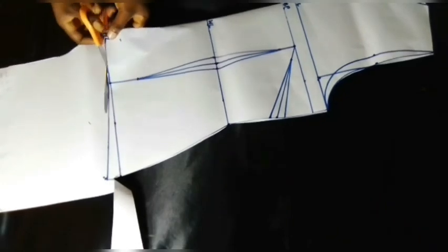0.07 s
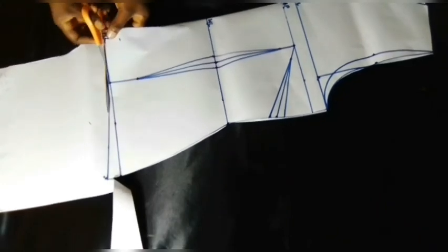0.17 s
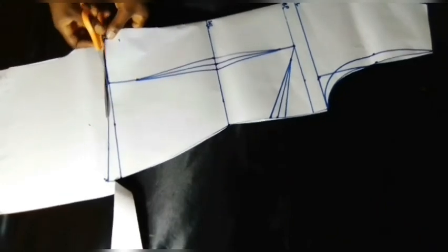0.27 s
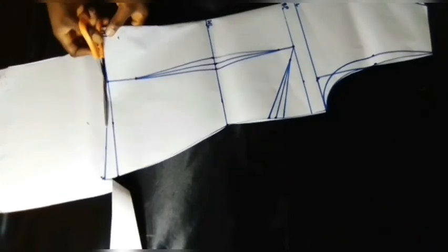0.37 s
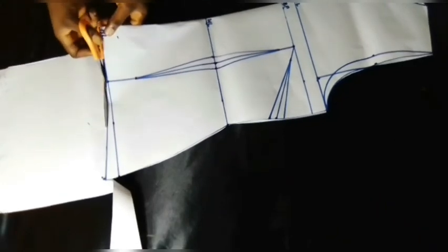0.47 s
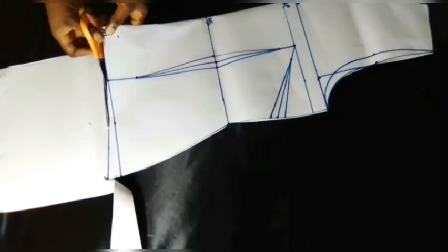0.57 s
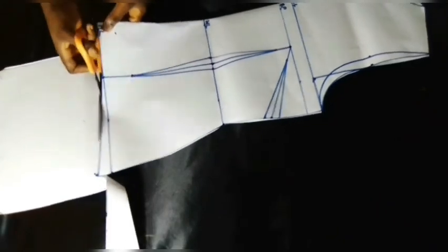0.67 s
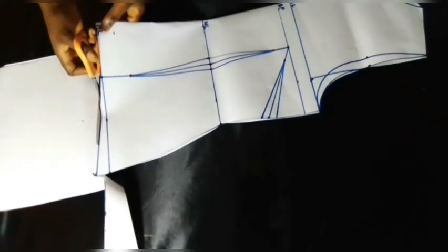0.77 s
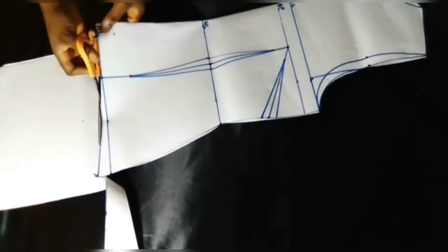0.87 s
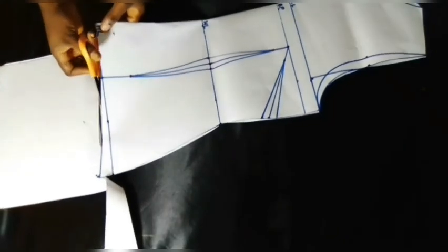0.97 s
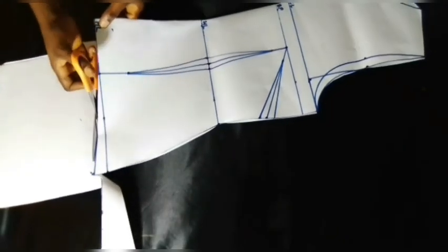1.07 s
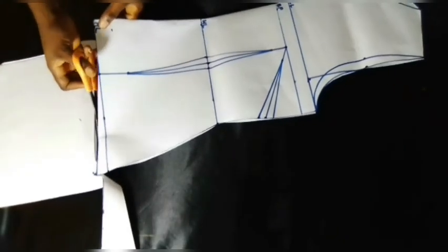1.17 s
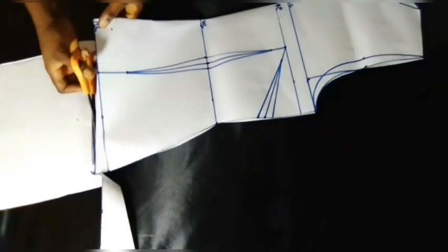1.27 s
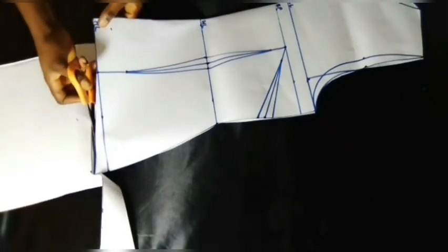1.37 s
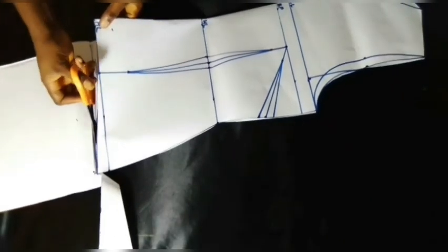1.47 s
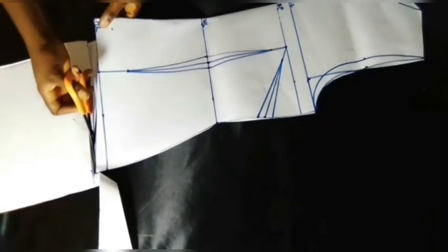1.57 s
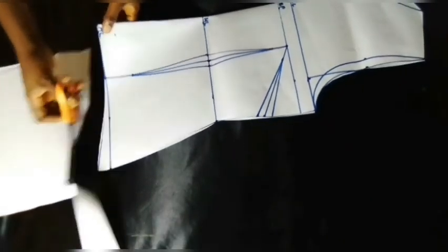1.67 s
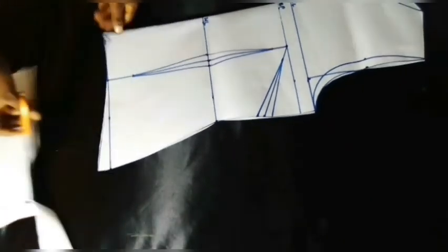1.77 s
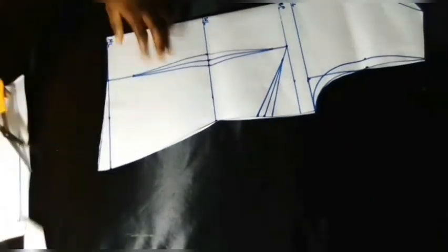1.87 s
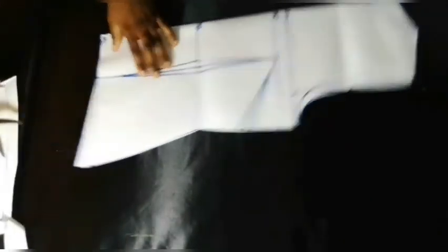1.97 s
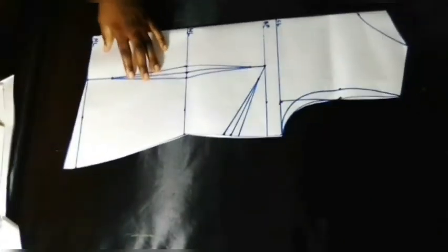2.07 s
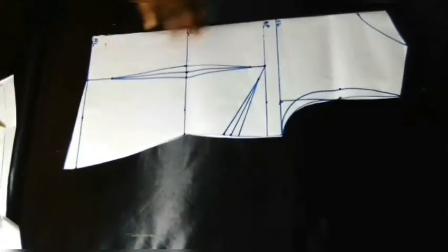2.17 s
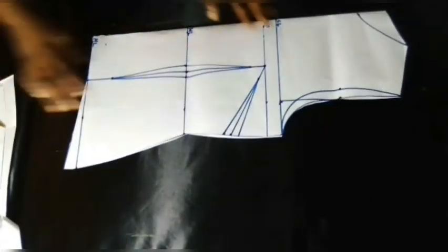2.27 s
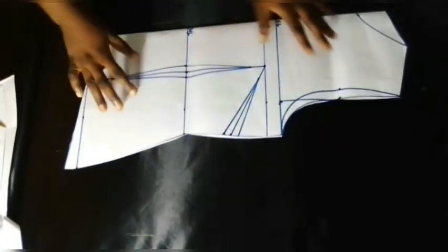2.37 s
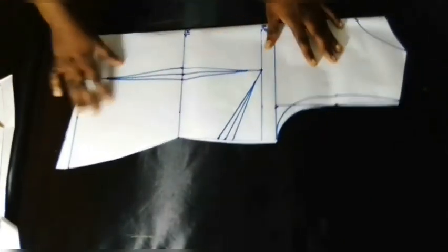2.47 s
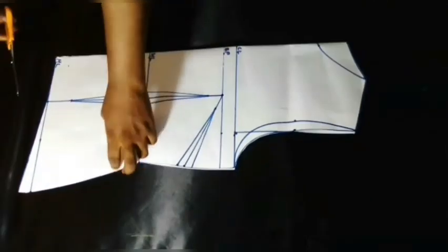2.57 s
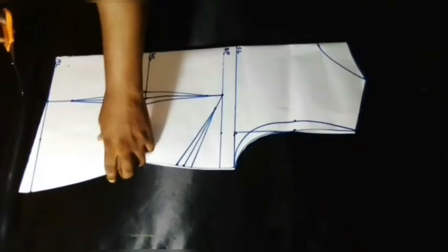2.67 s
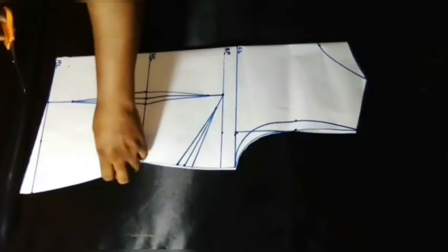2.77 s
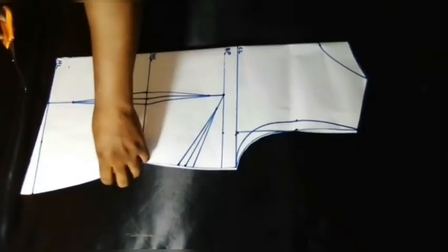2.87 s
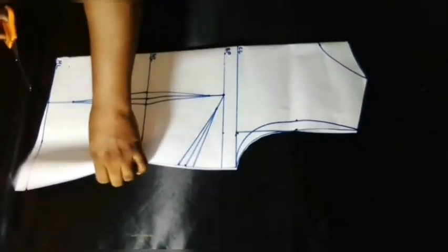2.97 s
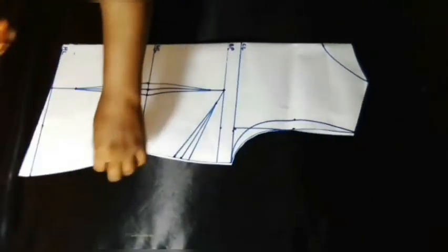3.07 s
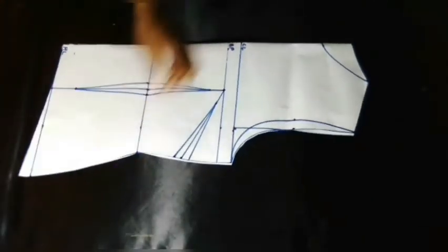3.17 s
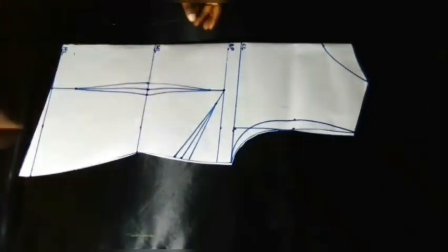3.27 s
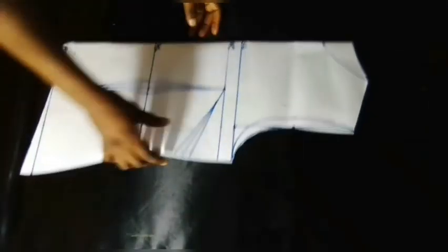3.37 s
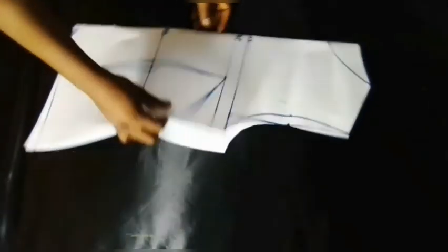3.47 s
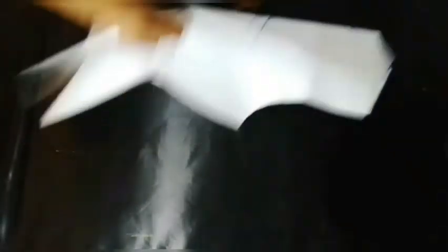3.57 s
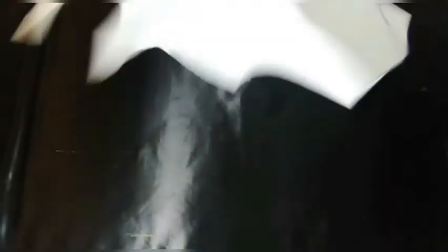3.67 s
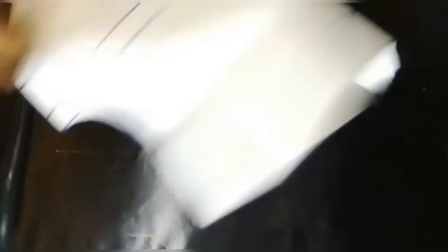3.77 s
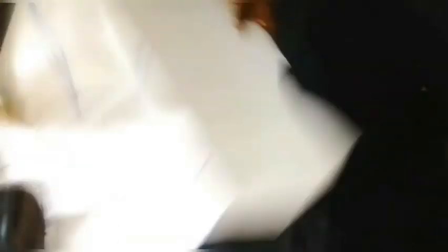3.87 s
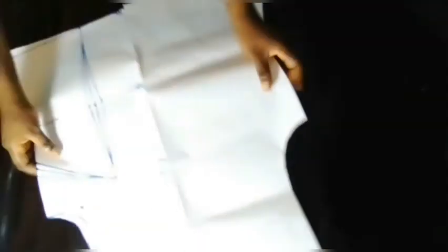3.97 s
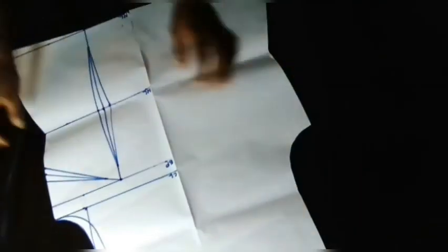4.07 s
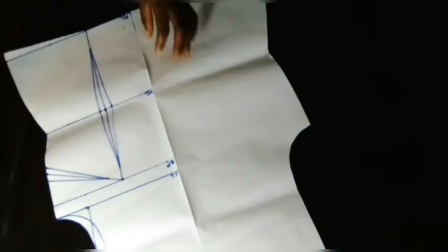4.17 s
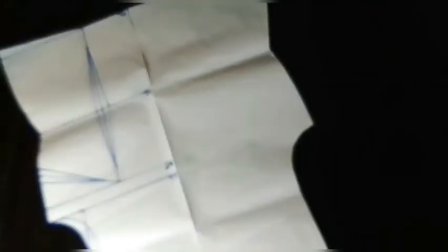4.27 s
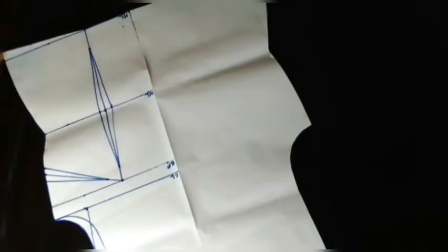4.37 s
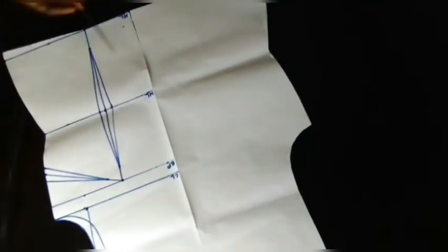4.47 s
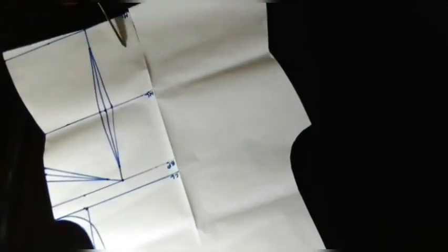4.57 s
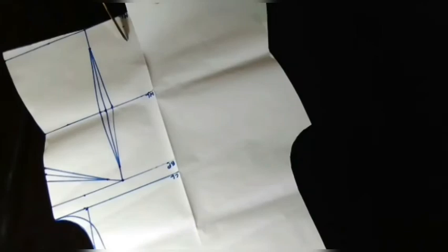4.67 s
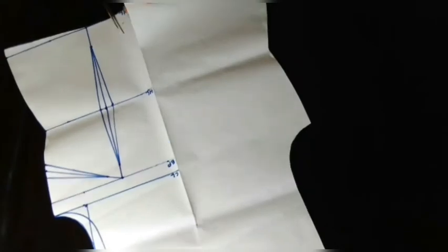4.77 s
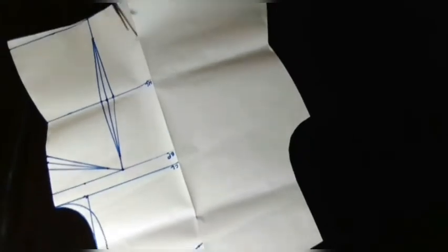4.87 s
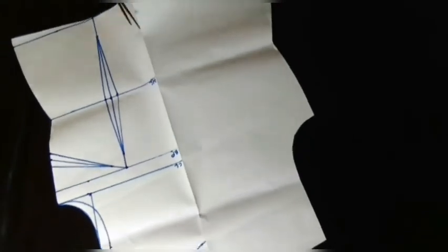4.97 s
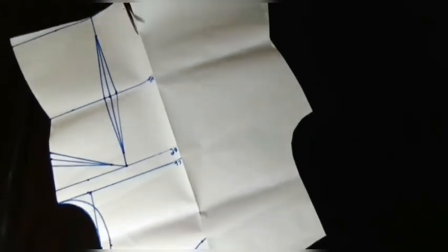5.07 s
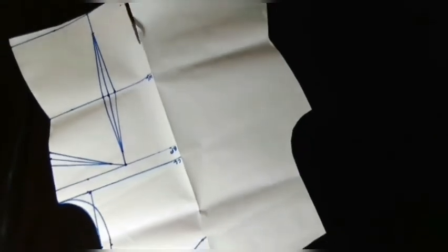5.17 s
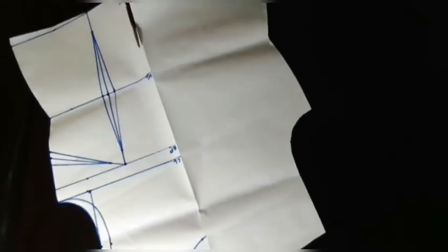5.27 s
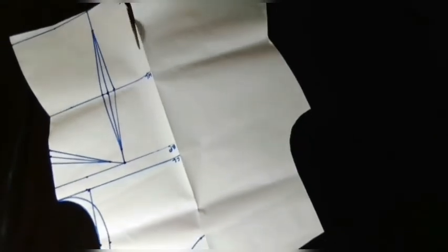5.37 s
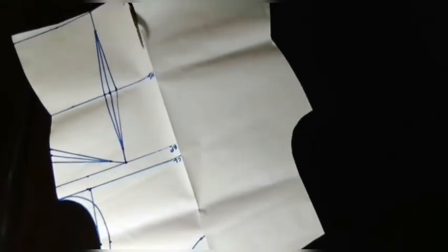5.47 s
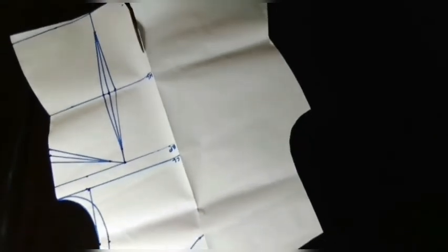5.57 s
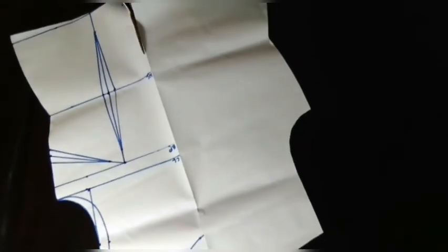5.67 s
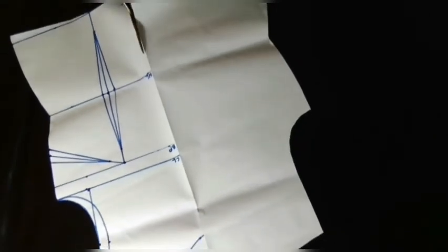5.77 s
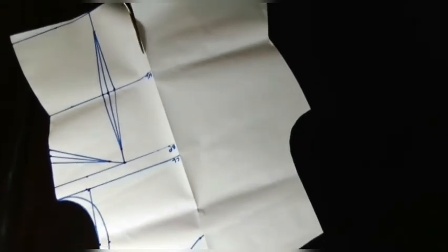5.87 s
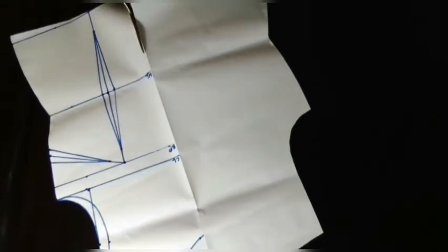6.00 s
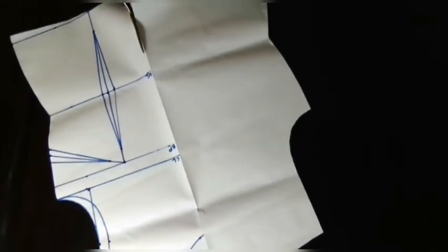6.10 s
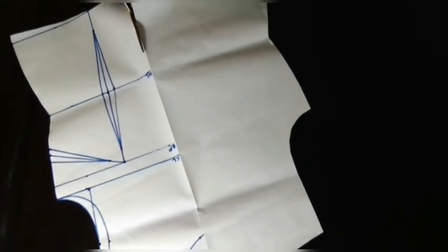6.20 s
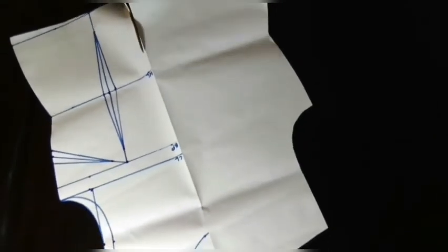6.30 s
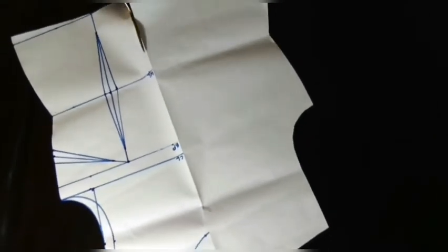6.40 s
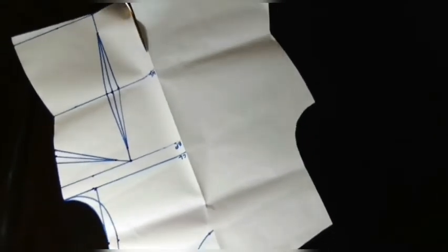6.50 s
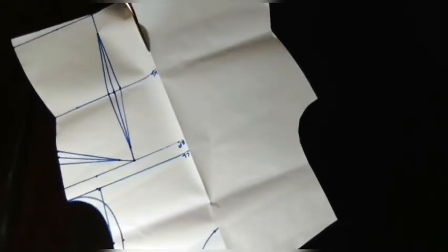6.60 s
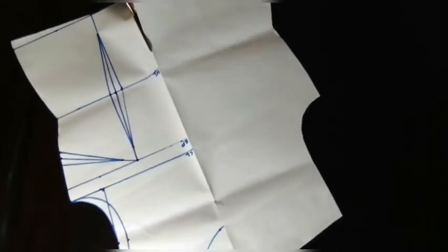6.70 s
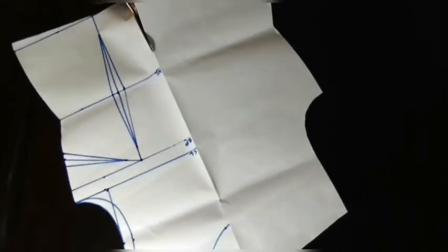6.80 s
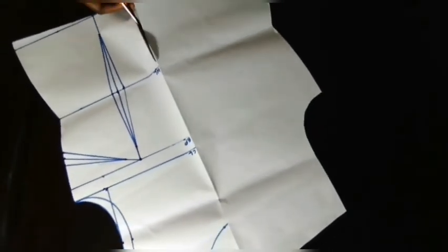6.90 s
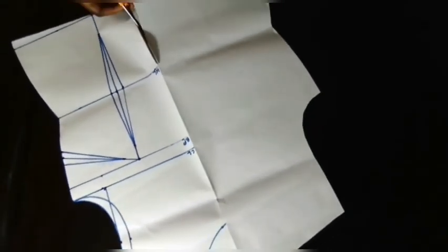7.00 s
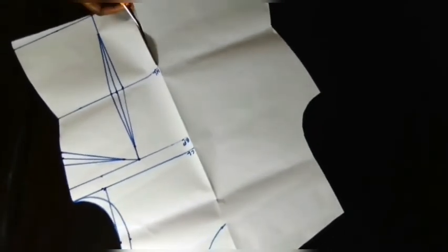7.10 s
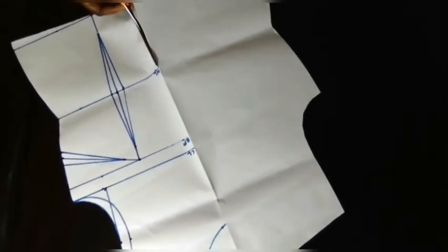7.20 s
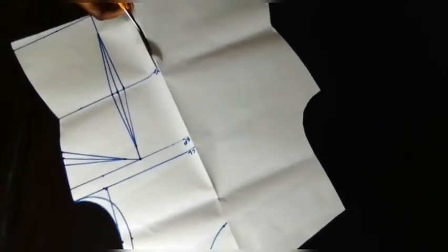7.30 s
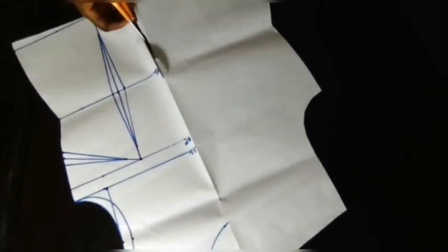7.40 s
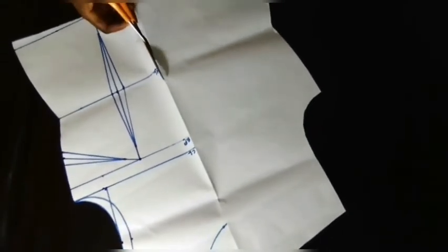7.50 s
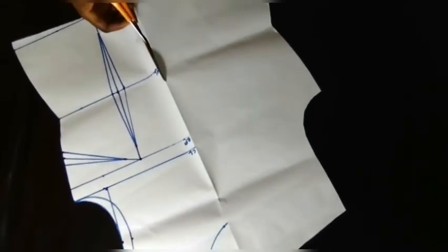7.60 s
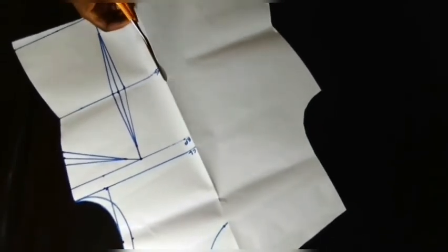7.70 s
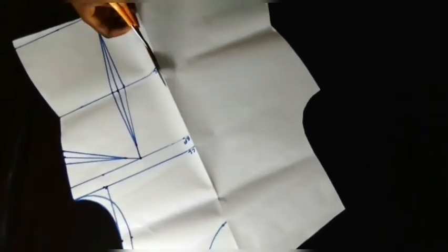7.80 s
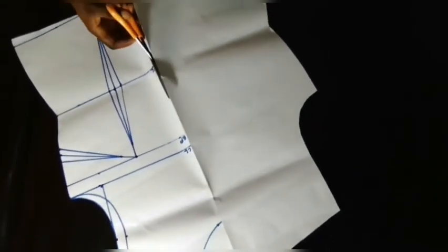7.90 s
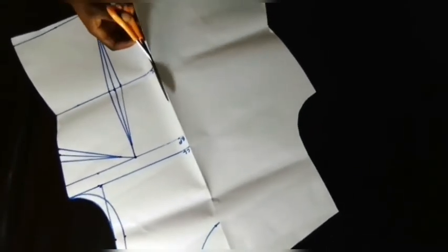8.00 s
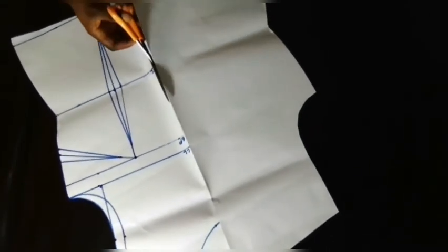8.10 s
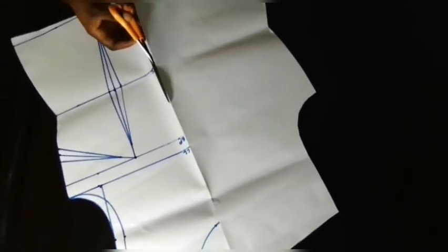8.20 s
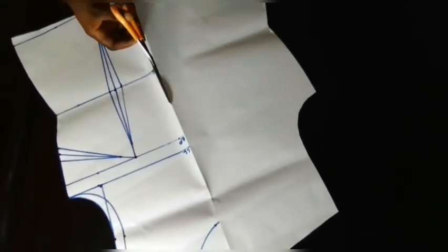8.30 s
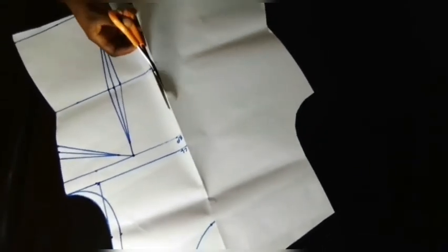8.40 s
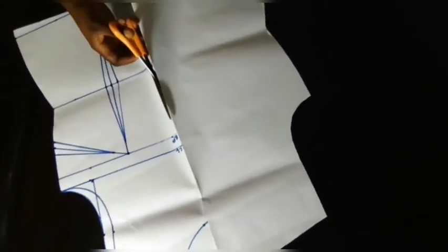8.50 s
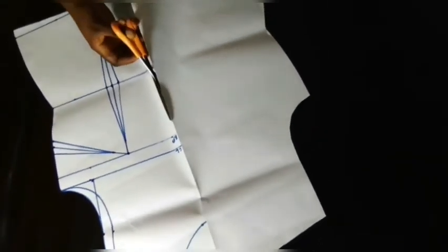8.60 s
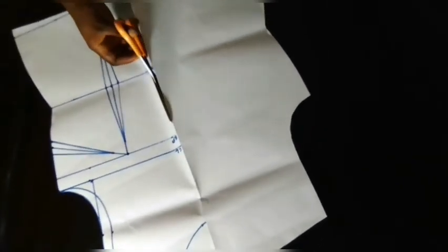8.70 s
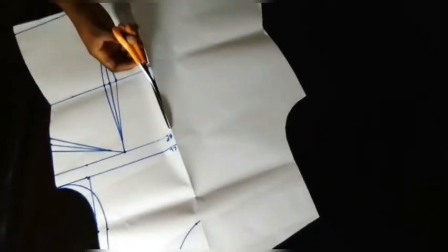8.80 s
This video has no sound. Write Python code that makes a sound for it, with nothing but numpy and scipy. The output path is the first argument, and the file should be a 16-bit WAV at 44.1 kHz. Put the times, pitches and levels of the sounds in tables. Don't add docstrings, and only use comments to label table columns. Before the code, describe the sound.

In a quiet, rather dry room, blades bite through paper with dense fibrous crunches and clicks. Then softer sliding and small table bumps, a brief gap in the sound, one strong low hand thud, and a burst of lively paper rattling. After sparse rustles and wooden taps, a second run of cutting begins with a bright snap and continues to the end. Thin hiss and far fan hum remain beneath.

```python
import sys
import numpy as np
from scipy import signal
from scipy.fft import rfft, irfft
from scipy.io import wavfile

SR = 44100
rng = np.random.default_rng(int(sys.argv[2]) if len(sys.argv) > 2 else 0)


def convert_level_to_amplitude(level_db):
    exponent = np.asarray(level_db, float) / 20
    return 10 ** exponent


def inscribe(sig):
    pcm = np.round(np.clip(np.atleast_2d(sig).T, -1, 1) * 32767)
    wavfile.write(sys.argv[1], SR, pcm.astype(np.int16))


N = 390285


def rms_one(x):
    return x / np.sqrt(np.mean(x ** 2) + 1e-20)


def low_pass(x, hz):
    return signal.sosfilt(signal.butter(4, hz, fs=SR, output="sos"), x)


def drift(rate):
    r = np.exp(-2 * np.pi * rate / SR)
    return rms_one(signal.lfilter([1], [1, -2 * r, r * r], rng.standard_normal(N + SR))[SR:])


def resonate(x, peaks):
    out = 0
    for k, (hz, width, db) in enumerate(peaks):
        r = np.exp(-np.pi * width / SR)
        b = (1 - r * r) / 2 * np.array([1, 0, -1])
        a = [1, -2 * r * np.cos(2 * np.pi * hz / SR), r * r]
        out = out + (-1) ** k * convert_level_to_amplitude(db) * signal.lfilter(b, a, x)
    return out


def ring(x, modes):
    out = 0
    for hz, db, t60 in modes:
        r = convert_level_to_amplitude(-60 / (t60 * SR))
        w = 2 * np.pi * hz / SR
        out = out + convert_level_to_amplitude(db) * signal.lfilter([0, np.sin(w)], [1, -2 * r * np.cos(w), r * r], x + 1e-18)
    return out


def held(s, hold, swell_db, rise, fall):
    start = max(round(s * SR) - SR // 10, 0)
    stop = min(round((s + hold) * SR) + SR // 5, N)
    age = np.arange(start, stop) / SR - s
    climb_db = rise * np.minimum(age, 0)
    hold_db = swell_db * np.clip(age / hold, 0, 1)
    fall_db = fall * np.maximum(age - hold, 0)
    return slice(start, stop), convert_level_to_amplitude(climb_db + hold_db - fall_db)


def clicks(events):
    out = np.zeros(N)
    out[[round(s * SR) for s, db in events]] = convert_level_to_amplitude([db for s, db in events])
    return out


def grains(per_s, spread_db):
    sizes = convert_level_to_amplitude(spread_db * np.minimum(rng.exponential(1, N), 5)) * rng.choice([-1, 1], N)
    return rms_one(sizes * (rng.random(N) < per_s / SR))


# (frequency [Hz], width
# [Hz], level [dB])
PRESENCE_PEAKS = [(3035, 340, -7), (3500, 420, 5.5), (3610, 340, -11.5)]
# (frequency [Hz], width [Hz], level [dB])
FLUTTER_PEAKS = [(1650, 130, 1.5), (2067, 470, 5), (2690, 980, 7)]
# (frequency [Hz], width [Hz], level [dB])
SHEET_PEAKS = [(715, 420, 0), (906, 250, -4), (1295, 510, 3.5)]
# (frequency [Hz], width [Hz], level [dB])
FIZZ_PEAKS = [(5500, 2000, 13), (8200, 2100, -6.5)]


def paper_voice(fibres, grit, flutter, body, fizz):
    out = 0
    # strength, resonances, top cut Hz, share of the bending
    layers = ((grit, PRESENCE_PEAKS, 4030, 0), (flutter, FLUTTER_PEAKS, 3100, 1),
              (body, SHEET_PEAKS, 2500, 1), (fizz, FIZZ_PEAKS, 10000, 0.3))
    for strength, peaks, cut_hz, bends in layers:
        steady, rung = 0, 0
        for peak in peaks:
            push = fibres * rng.choice([-1, 1], N)
            bending = convert_level_to_amplitude(bends * 4 * drift(15.4))
            steady = steady + resonate(push, [peak])
            rung = rung + resonate(push * strength * bending, [peak])
        out = out + low_pass(rung, cut_hz) / np.std(low_pass(steady, cut_hz))
    return out


def colour(action, depth_db):
    flutter_db, body_db, fizz_db = action
    return convert_level_to_amplitude([[0], [flutter_db + 0.54 * depth_db], [body_db + 0.96 * depth_db],
                [fizz_db - 0.29 * depth_db]])


# (time [s], hold [s], grit [dB], swell over the hold [dB], depth, how far the sheet joins in [dB])
FIRST_STROKES = [(0.0, 0.025, -50, -9, 6), (.05, 0.047, -56.5, -5, 6), (.16, .11, -51.5, -4, 5),
                 (.29, 0.097, -52.5, 1, 8), (.43, 0.071, -54.5, 0.5, 0), (.5, 0.093, -56.5, -16, 16),
                 (.575, 0.097, -51, 7, 7), (.755, 0.078, -55.5, 0, -3), (.87, .17, -50.5, 0.5, 4),
                 (1.14, 0.06, -47.5, 0, 1), (1.25, 0.055, -40.5, -3, 1.5), (1.36, 0.033, -47, 6.5, -6),
                 (1.42, 0.094, -51.5, 3, -7), (1.55, 0.045, -45, -6, -5)]
# (time [s], peak [dB], rise [s], depth [dB])
FIRST_BITE_SWELLS = [(.1533, -34, 0.0068, 15), (0.1708, -22.5, 0.0065, 7.5), (0.2463, -24.5, 0.0099, -11),
                     (0.494, -34.5, 0.012, 7), (.6026, -36.5, 0.018, 1), (.643, -44, 0.0035, 15.5),
                     (.7572, -44, 0.0048, -11), (0.903, -32, 0.0094, -9), (0.979, -27, 0.009, -3),
                     (1.06, -55, 0.017, 18.5), (1.114, -32, 0.0036, -3), (1.1694, -34, 0.015, -2),
                     (1.1994, -38, 0.0033, 5), (1.287, -41, 0.0059, -3), (1.381, -22.5, 0.01, -9),
                     (1.5465, -29.5, 0.017, -4)]
# (time [s], hold [s], grit [dB], swell [dB], depth [dB])
SHEET_SLIDES = [(1.618, 0.14, -52, 7.5, -13), (1.775, 0.25, -55.5, 6, -11), (2.399, 0.062, -52.5, -5, -17),
                (2.55, 0.28, -72.5, 6, 4), (2.872, 0.068, -57, 5, -4), (2.99, 0.044, -55, 5, -11),
                (3.413, .18, -50, 2, -6), (3.626, 0.27, -41, -5.5, 11), (3.904, 0.15, -57.5, 2, 2.5),
                (4.403, 0.29, -77, 20, 0), (4.734, 0.15, -59, 4.5, -3), (4.965, 0.063, -59, -4, -10),
                (5.129, 0.035, -64, 2, 7), (5.245, .1, -72, 5, 6), (5.351, 0.22, -60, -4.5, 10),
                (5.601, 0.077, -59, 0.5, 6), (5.727, 0.17, -86, -9, 2), (6.08, 0.039, -68, 6, -4)]
# (time [s], peak [dB], rise [s], depth [dB])
BUCKLE_SWELLS = [(1.7044, -40, 0.0076, 8), (1.76, -30.5, 0.0056, -15), (1.89, -43.5, 0.012, 2),
                 (1.986, -40, 0.0052, -18), (2.38, -36, 0.02, 8), (2.78, -44, 0.0049, 12),
                 (2.8734, -44, .0094, 17), (2.9871, -47, 0.0052, 4), (3.424, -31, 0.0055, 3),
                 (3.497, -24, 0.0085, 4.5), (3.5294, -34, 0.0064, 1), (3.626, -22, 0.0071, 17),
                 (3.6794, -32, 0.025, 14), (3.7294, -24, 0.015, 12), (3.848, -30.5, 0.027, 21),
                 (3.95, -49, 0.012, 26), (4.003, -30.5, 0.0074, 3), (4.974, -36, .0074, 10),
                 (5.3527, -39, 0.0061, 8), (5.464, -37, 0.01, 14.5), (5.5094, -42, 0.011, 17.5),
                 (5.612, -39, 0.0036, 1), (5.653, -41.5, 0.0064, 10), (5.961, -50, 0.004, 18)]
# (time [s], hold [s], grit [dB], swell [dB], depth [dB])
SECOND_STROKES = [(6.243, 0.084, -47.5, -21, 7), (6.493, 0.11, -72, -2, 12), (6.618, 0.084, -63, 13, 12),
                  (6.763, 0.18, -55.5, -2.5, 3), (7.03, 0.15, -65, 15, 7), (7.214, 0.016, -47, -6, 16),
                  (7.262, 0.089, -44.5, 2.5, 3), (7.4, 0.035, -60.5, 4, 0), (7.576, 0.08, -62.5, 6.5, 14),
                  (7.678, 0.037, -38.5, -3, 9.5), (7.738, .015, -47, 0, -3), (7.765, 0.125, -40.5, -2, 0),
                  (7.898, 0.066, -57, -0.5, 6), (8.061, 0.23, -56, 3.5, -3), (8.277, 0.22, -50.5, 0.5, 1),
                  (8.585, 0.083, -54, 2, 0), (8.675, 0.027, -46, 0, 7), (8.75, 0.12, -40.5, -1.5, -3)]
# (time [s], peak [dB], rise [s], depth [dB])
SECOND_BITE_SWELLS = [(6.5804, -48, 0.011, 15), (6.695, -42, 0.0089, 8), (6.757, -42, .004, 6),
                      (6.933, -36.5, 0.0074, -7), (7.319, -36, 0.02, 6), (7.666, -37.5, 0.023, 13),
                      (7.7179, -40, 0.0026, 1), (7.7433, -46, 0.004, 0), (7.775, -29.5, 0.017, 0),
                      (7.824, -33, 0.014, 0), (7.9544, -38, .0052, 13), (8.042, -39, 0.007, 1),
                      (8.1923, -40, .0043, 2), (8.2924, -31, 0.0095, 2), (8.36, -41, 0.05, -14),
                      (8.579, -42, 0.009, -4), (8.694, -35, 0.0095, 13.5), (8.75, -35, 0.012, -27),
                      (8.796, -36, 0.0085, -3)]
# (time [s], hold [s], grit [dB], swell [dB], depth [dB])
SHEET_JOLTS = [
    (.02, 0.0087, -60, -6, 15),
    (1.866, 0.04, -49, -12.5, 17.5),
    (2.08, 0.009, -54.5, -0.5, 12),
    (3.216, 0.084, -31, -27, 23),
    (4.145, 0.02, -64.5, 0.5, 32.5),
    (4.258, 0.01, -57, -6, 16),
    (4.538, 0.013, -58, 1, 20),
    (6.27, 0.083, -70, 2, 26),
]


def strokes():
    fibres = rms_one(grains(5000, 0) * convert_level_to_amplitude(1.5 * drift(47)))
    # flutter, body and fizz, dB re grit at depth 0
    slide_colour = (-11, -19.5, -21)
    rest_db = -80.5 + 1.16 * drift(5.7)
    strengths = convert_level_to_amplitude(rest_db) * colour(slide_colour, 9.5)
    # strokes, swells, colour, rise and fall in dB per s
    actions = ((FIRST_STROKES, FIRST_BITE_SWELLS, (-11.5, -22.5, -22.5), 1009, 568),
               (SHEET_SLIDES, BUCKLE_SWELLS, slide_colour, 1009, 568),
               (SECOND_STROKES, SECOND_BITE_SWELLS, (-8, -24.5, -25.5), 1009, 568),
               (SHEET_JOLTS, [], (-13, -17.5, -14), 2500, 800))
    for rows, swells, action, rise, fall in actions:
        for s, hold, db, swell_db, depth_db in rows:
            span, shape = held(s, hold, swell_db, rise, fall)
            strengths[:, span] += convert_level_to_amplitude(db - 9.5) * shape * colour(action, depth_db)
        for s, db, rise_s, depth_db in swells:
            at = round(s * SR)
            age = np.arange(SR // 20) / SR / rise_s
            shape = (age * np.exp(1 - age)) ** 2
            strengths[:, at:at + len(age)] += convert_level_to_amplitude(db - 22.5) * shape * colour(action, depth_db)
    return paper_voice(fibres, *strengths)


# (time [s], peak [dB], flutter re peak [dB], fizz re peak [dB], t60 [s])
FIRST_CUT_SNAPS = [
    (0.128, -47, 6, -24, 0.051),
    (0.228, -38.5, -8, -15, 0.13),
    (0.381, -34, -3, -35, 0.068),
    (0.4246, -34.5, -28, -30, 0.041),
    (1.149, -27.5, -20, -27, 0.11),
    (1.2435, -27.5, -30, -25, 0.058),
    (1.355, -27.5, -30, -33, 0.071),
    (1.452, -33.5, -11, -13, 0.044),
]
# (time [s], peak [dB], flutter re peak [dB], fizz re peak [dB], t60 [s])
CREASE_SNAPS = [
    (2.3994, -29, -20, -36, 0.072),
    (3.2125, -31, -28, -47, 0.2),
    (3.4363, -27.5, -11, -38, 0.11),
    (3.494, -24, -16, -19, 0.15),
    (3.797, -20.5, -4.5, -43, 0.048),
    (3.862, -18.5, -36, -55, 0.069),
    (4.2583, -47, 1.5, -34, 0.03),
    (4.7284, -33.5, -29, -38, 0.039),
    (4.7782, -27.5, -5, -35, 0.016),
    (5.45, -30.5, -20, -22, 0.038),
]
# (time [s], peak [dB], flutter re peak [dB], fizz re peak [dB], t60 [s])
SECOND_CUT_SNAPS = [(6.2334, -21.5, -10, -19, 0.066), (6.24, -23, -8, -42, 0.038),
                    (6.767, -29.5, -7, -27, 0.072), (6.8118, -26.5, -12, -21, 0.09),
                    (7.208, -26.5, -36, -38, 0.036), (7.261, -34.5, -1.5, -39, 0.061),
                    (8.073, -34.5, -28, -24, 0.11), (8.1215, -30.5, -11, -23, 0.068),
                    (8.232, -34, -10, -32, 0.044), (8.278, -37, 1, -20, 0.089),
                    (8.651, -33.5, -10.5, -22, 0.17), (8.753, -40, -15, -40, 0.081)]


def snaps():
    strengths = np.zeros((4, N))
    for s, db, flutter_db, fizz_db, t60 in FIRST_CUT_SNAPS + CREASE_SNAPS + SECOND_CUT_SNAPS:
        at = round(s * SR)
        age = np.arange(min(N - at, SR // 8)) / SR
        shape = convert_level_to_amplitude(db - 15.5 - 60 * age / t60) * np.minimum(age / 0.0027, 1)
        strengths[:, at:at + len(age)] += shape * convert_level_to_amplitude([[0], [flutter_db], [flutter_db - 6.5], [fizz_db]])
    return paper_voice(grains(12000, 0.94), *strengths)


# (time [s], peak [dB])
BLADE_TICKS = [(0.38, -30), (3.799, -33), (4.7298, -38), (4.7434, -51), (4.7808, -31), (5.45, -40.5),
               (6.2356, -22), (6.241, -24), (6.247, -28), (7.208, -22), (7.261, -31), (8.076, -36)]
# (time [s], peak [dB])
MORE_TICKS = [(0.3219, -40.5), (0.4254, -50), (0.8036, -43), (1.9044, -42), (3.4273, -38), (3.5349, -31),
              (3.6287, -32), (3.7445, -22), (3.809, -25), (7.718, -28), (7.826, -24), (8.0511, -41),
              (8.2294, -31.5), (8.3004, -26), (8.6604, -29), (8.7054, -32), (8.753, -28)]


def ticks():
    blows = clicks(MORE_TICKS) * convert_level_to_amplitude(-1.5) + clicks(BLADE_TICKS)
    return convert_level_to_amplitude(17) * low_pass(resonate(blows, [(2330, 1230, -7), (3230, 600, 1.5)]), 5000)


# (time [s], level [dB], t60 [s])
CREASE_CRACKS = [
    (1.39, -78, .06),
    (1.58, -78, .05),
    (1.76, -78, .06),
    (3.503, -58, 0.042),
    (6.2355, -63, .03),
    (6.813, -80, 0.025),
]


def cracks():
    out = np.zeros(N)
    age = np.arange(SR // 10) / SR
    for s, db, t60 in CREASE_CRACKS:
        hiss = np.diff(rng.standard_normal(len(age) + 1))
        out[round(s * SR):][:len(age)] += convert_level_to_amplitude(db - 60 * age / t60) * np.minimum(age / 0.002, 1) * hiss
    return out


def rubbed_note(out, s, hold, hz, db, width):
    span, shape = held(s, hold, 0, 2200, 1660)
    rub = rng.standard_normal(SR)[:len(shape)] * shape
    rung = resonate(resonate(rub, [(hz, width, 0)]), [(hz, 4 * width, 0)])
    out[span] += convert_level_to_amplitude(db - 0.5) * rung / np.abs(rung).max()


# (time [s], hold [s], frequency [Hz], level [dB])
PATCH_SINGS = [(0.173, 0.013, 1490, -54), (0.379, 0.0081, 1180, -49.5), (0.621, 0.044, 1290, -53),
               (0.916, 0.016, 2200, -54), (0.978, 0.021, 1950, -51), (1.155, 0.039, 1915, -50),
               (1.27, 0.014, 1370, -57.5), (1.358, 0.023, 1360, -59), (1.38, 0.015, 2080, -48),
               (1.87, 0.012, 1050, -55), (1.876, .008, 1500, -53), (1.898, .008, 2230, -60),
               (2.075, 0.015, 1014, -46), (3.209, .012, 950, -42), (3.436, 0.0077, 1420, -51.5),
               (3.439, 0.0076, 2600, -48), (3.5, 0.012, 2425, -48), (3.493, 0.023, 1840, -55),
               (3.533, .01, 2780, -51), (4.257, 0.0088, 1890, -53.5), (6.237, .012, 4250, -44),
               (7.21, 0.011, 2115, -47), (7.671, 0.034, 2220, -42), (7.699, 0.012, 1880, -48),
               (7.777, .1, 1980, -63)]


def sings():
    out = np.zeros(N)
    for s, hold, hz, db in PATCH_SINGS:
        rubbed_note(out, s, hold, hz, db, 90)
    return out


# (time [s], hold [s], frequency [Hz], level [dB])
TABLE_NOTES = [(0.035, .012, 276, -46.5), (1.87, 0.018, 235, -50), (1.916, .02, 194, -53.5),
               (2.077, 0.0093, 503, -45), (2.08, 0.023, 274, -50.5), (2.886, 0.032, 400, -52),
               (3.225, .03, 253, -40), (3.225, 0.029, 211, -31), (3.222, 0.022, 780, -44),
               (3.227, 0.035, 1030, -40), (3.664, 0.012, 298, -48), (3.764, .01, 249, -53),
               (4.147, .012, 200, -49), (4.263, 0.0086, 820, -46), (4.275, 0.012, 251, -54),
               (4.542, 0.0076, 332, -36), (4.55, 0.028, 503, -45), (4.547, .008, 690, -55)]


def table_notes():
    out = np.zeros(N)
    for s, hold, hz, db in TABLE_NOTES:
        rubbed_note(out, s, hold, hz, db, 0.15 * hz)
    return out


# (time [s], hold [s], push [dB], thud re push [dB], boom re push [dB])
TABLE_BUMPS = [(0.024, 0.0077, -51, 8, -7.5), (1.374, 0.0066, -53, -4, -28), (1.864, 0.013, -49.5, 0, -7.5),
               (1.916, 0.0093, -59, 5, -5), (2.071, 0.014, -49.5, 1, -22), (2.75, 0.041, -60.5, 6, 5),
               (2.848, 0.019, -54, 7.5, 6.5), (2.886, 0.02, -48.5, 2, -5), (3.219, 0.03, -35, -3, -12),
               (3.619, 0.27, -56.5, -5, -35), (3.978, 0.0083, -68.5, 10, 18),
               (4.144, 0.018, -49, 0.5, -6.5), (4.23, 0.0091, -54, 3, 4.5), (4.265, 0.007, -43, -6, -16),
               (4.537, 0.0076, -37.5, 0, -18), (6.233, .01, -61, 2, -12), (6.27, 0.086, -58.5, -1.5, -15)]
# (frequency [Hz], level [dB], t60 [s])
TABLE_MODES = [(402, -6.5, 0.081), (435, -6.5, 0.043), (479, -10.5, 0.065), (514, -5, 0.038),
               (634, -5, 0.034), (637, -14, 0.036), (724, -44, 0.083)]
# (frequency [Hz], level [dB], t60 [s])
THUD_MODES = [(218, -7, 0.32), (256.5, -3, 0.088), (294, -0.5, 0.082)]
# (frequency [Hz], width [Hz], level [dB])
BOOM_PEAK = [(134.2, 36, -1)]


def bumps():
    push, thud, boom = strengths = np.zeros((3, N))
    for s, hold, db, thud_db, boom_db in TABLE_BUMPS:
        span, shape = held(s, hold, 0, 2200, 650)
        strengths[:, span] += shape * convert_level_to_amplitude([[db - 5.0], [db + thud_db - 7.5], [db + boom_db - 8.0]])
    contact = grains(2500, 0.89)
    out = ring(contact * push, TABLE_MODES) / np.std(ring(contact, TABLE_MODES))
    out = out + ring(contact * thud, THUD_MODES) / np.std(ring(contact, THUD_MODES))
    steady_boom = resonate(resonate(contact, BOOM_PEAK), BOOM_PEAK)
    return out + resonate(resonate(contact * boom, BOOM_PEAK), BOOM_PEAK) / np.std(steady_boom)


# (time [s], peak [dB])
EDGE_KNOCKS = [(0.023, -25.5), (1.877, -32), (2.079, -40), (2.089, -41.5), (2.873, -35), (3.222, -15),
               (3.242, -19.5), (3.259, -26), (4.139, -38), (4.153, -40), (4.267, -34), (4.535, -34),
               (4.548, -27)]


def knocks():
    strikes = clicks(EDGE_KNOCKS)
    return convert_level_to_amplitude(-14.5) * ring(strikes, TABLE_MODES) + convert_level_to_amplitude(20.5) * resonate(strikes, [(700, 880, 0.0077)])


# (time [s], hold [s], frequency [Hz], level [dB], fall [dB per s])
HAND_SLAP = (3.222, .03, 135, -27, 330)


def slap():
    s, hold, hz, db, fall = HAND_SLAP
    out = np.zeros(N)
    span, shape = held(s, hold, 3.0, 2200, fall)
    out[span] = convert_level_to_amplitude(db) * shape * np.sin(2 * np.pi * hz * np.arange(len(shape)) / SR)
    return out


def room(x):
    age = np.arange(SR // 2) / SR
    tail = rng.standard_normal(len(age)) * convert_level_to_amplitude(-60 * age / 0.11) * (age > 0.004)
    tail = signal.lfilter([1], [1, -0.6], tail)
    return signal.fftconvolve(x, tail / np.linalg.norm(tail))[:N]


# (frequency [Hz], width [Hz], level [dB])
FAN_BANDS = [(380, 45, -93), (478, 45, -75), (3580, 150, -82)]
# (frequency [Hz], level [dB], pitch wander [share])
FAN_TONES = [(154, -77, 0.01198), (297.8, -71, 0.005)]


def far_fan():
    out = np.zeros(N)
    for hz, width, db in FAN_BANDS:
        out += convert_level_to_amplitude(db) * rms_one(resonate(rng.standard_normal(N), [(hz, width, 0)]))
    for hz, db, wander in FAN_TONES:
        level_db = db + 0.74 * drift(2.7)
        turn = np.cumsum(hz * (1 + wander * drift(3.26))) / SR
        out += convert_level_to_amplitude(level_db) * np.sin(2 * np.pi * turn)
    return out


# (frequency [Hz], density [dB per Hz])
AIR_SPECTRUM = [(18, -51), (30, -32), (123, -14.5), (151, -9), (259, -13.5), (295, -2.5), (481, -28),
                (561, -19), (621, -15.5), (2300, -25), (3470, -24.5), (4490, -34), (13900, -35.5)]


def room_air():
    hz = np.fft.rfftfreq(N, 1 / SR) + 1
    knee_hz, air_db = np.transpose(AIR_SPECTRUM)
    shape = convert_level_to_amplitude(np.interp(np.log(hz), np.log(knee_hz), air_db))
    return convert_level_to_amplitude(-63.5 - 6.5) * rms_one(irfft(rfft(rng.standard_normal(N)) * shape, N))


def scene():
    paper = strokes() + snaps() + ticks() + cracks() + sings()
    table = low_pass(bumps() + knocks(), 1070) + table_notes() + slap()
    near = signal.sosfilt(signal.butter(4, 105, "high", fs=SR, output="sos"), paper + table)
    return np.tile(near + convert_level_to_amplitude(-16) * room(near) + far_fan() + room_air(), (2, 1))


def roll_off(x):
    return signal.sosfilt(signal.butter(12, 15230, fs=SR, output="sos"), x)


# (time [s], level [dB])
GAP = [
    (2.465, 7),
    (2.466, -24),
    (2.485, -13),
    (2.499, 6),
]


def record(dry):
    hiss = signal.sosfilt(signal.butter(2, 5000, "high", fs=SR, output="sos"), rng.standard_normal(N))
    unlike = convert_level_to_amplitude(-95 + 1.5 * drift(10.0)) * hiss + convert_level_to_amplitude(-44.5) * drift(300) * dry[0]
    top_cut = signal.ellip(10, 1, 60, 14000, fs=SR, output="sos")
    heard = signal.sosfilt(top_cut, dry + unlike * [[1], [-1]])
    gap = convert_level_to_amplitude(np.interp(np.arange(N) / SR, *np.transpose(GAP)))
    mix = heard * gap + convert_level_to_amplitude(-91) * low_pass(hiss, 12000)
    return roll_off(mix)


dry = scene()
out = record(dry)
inscribe(out)
```